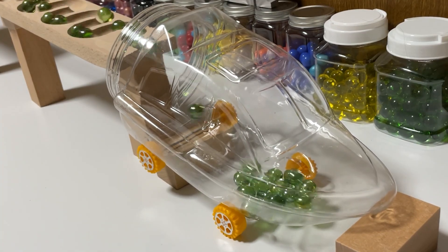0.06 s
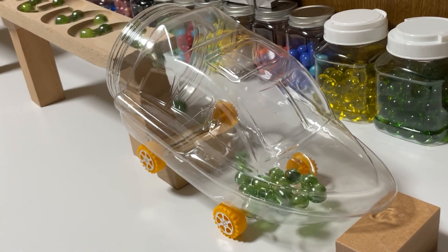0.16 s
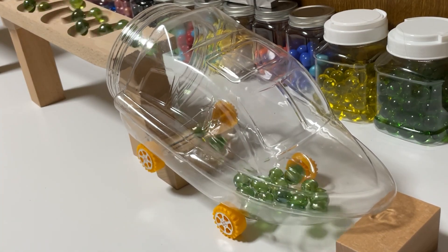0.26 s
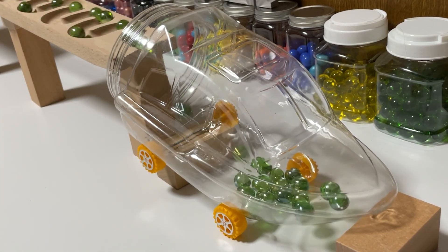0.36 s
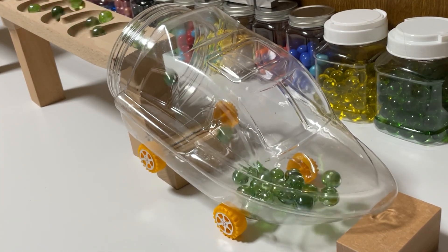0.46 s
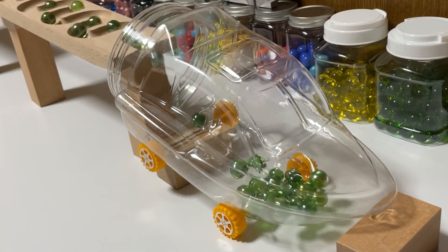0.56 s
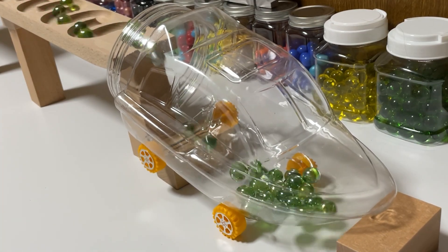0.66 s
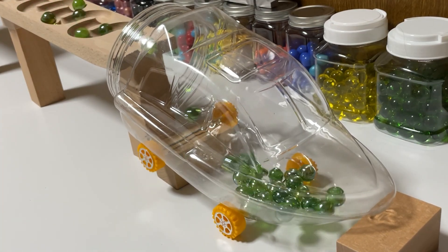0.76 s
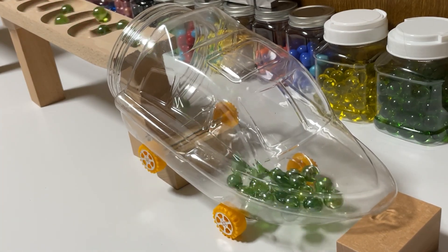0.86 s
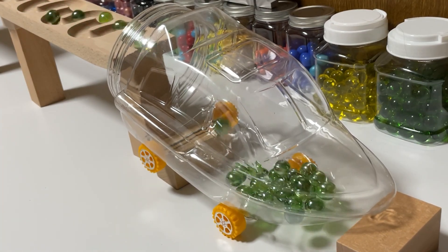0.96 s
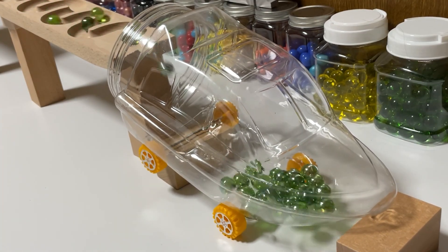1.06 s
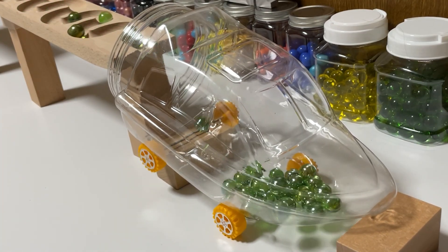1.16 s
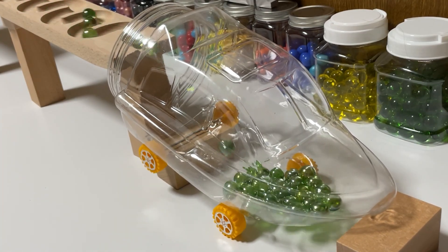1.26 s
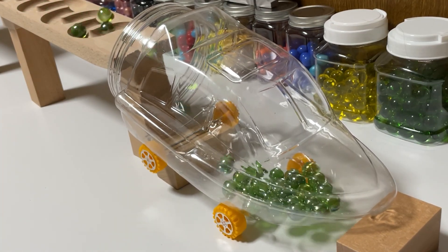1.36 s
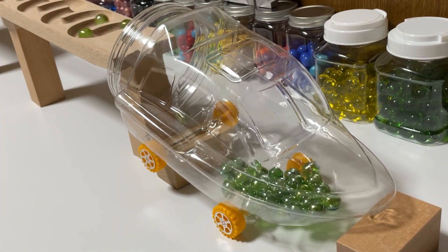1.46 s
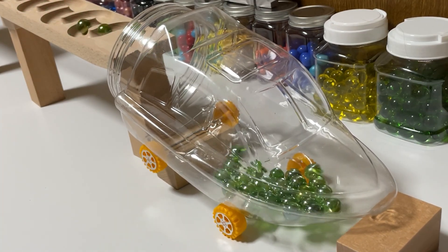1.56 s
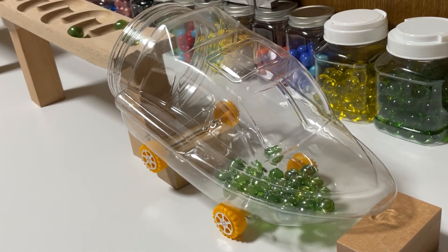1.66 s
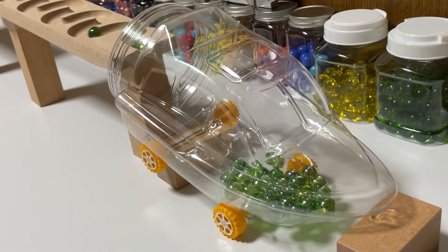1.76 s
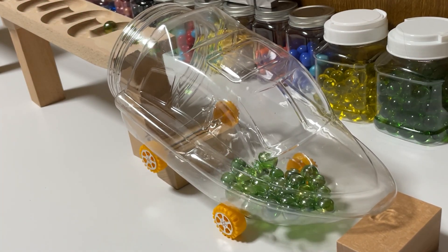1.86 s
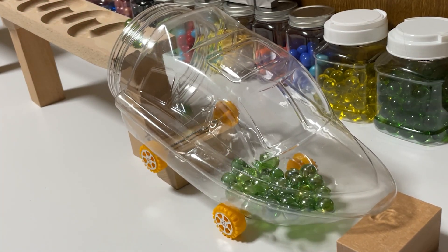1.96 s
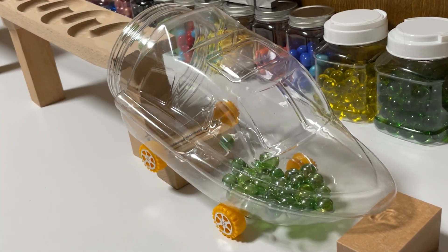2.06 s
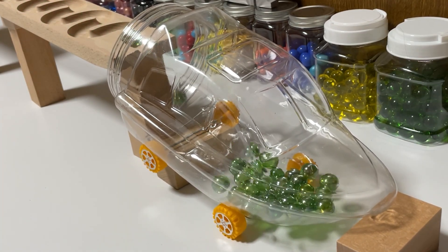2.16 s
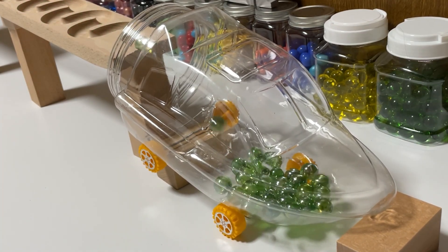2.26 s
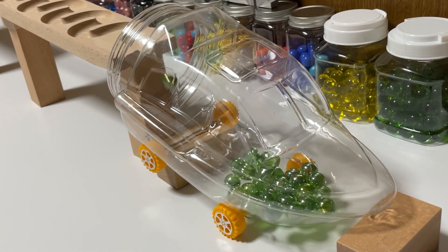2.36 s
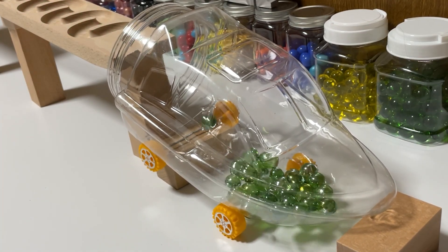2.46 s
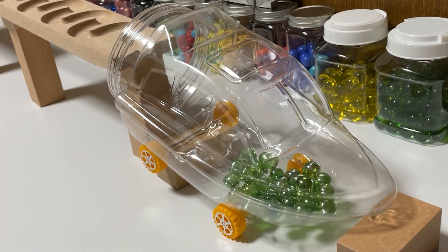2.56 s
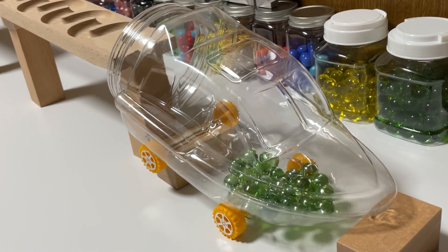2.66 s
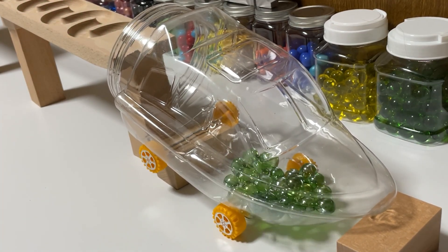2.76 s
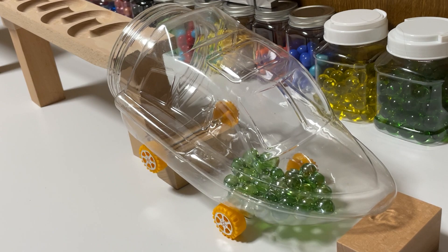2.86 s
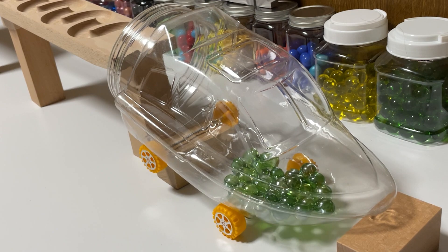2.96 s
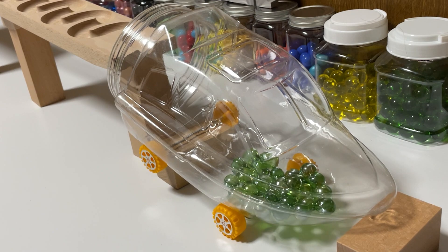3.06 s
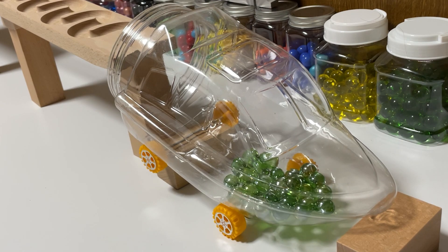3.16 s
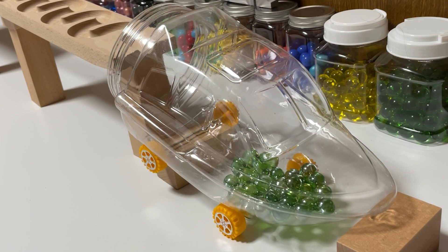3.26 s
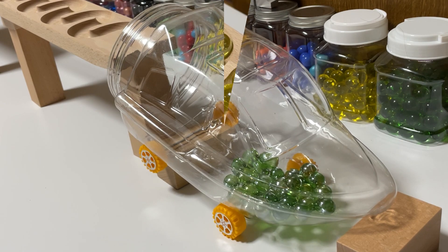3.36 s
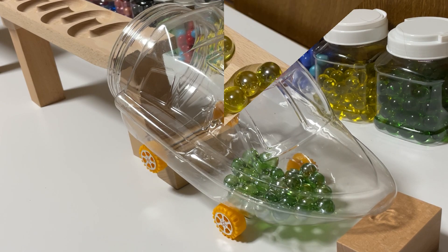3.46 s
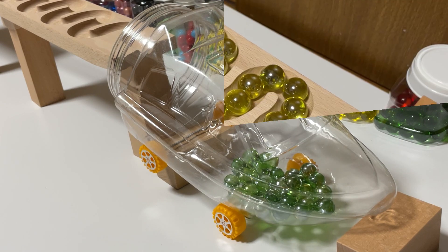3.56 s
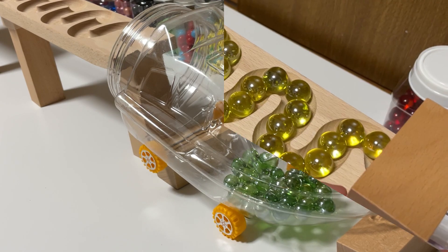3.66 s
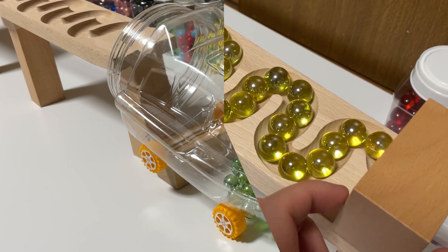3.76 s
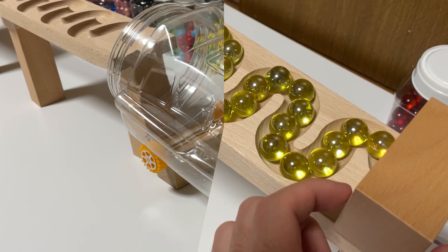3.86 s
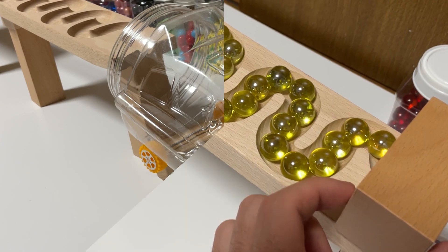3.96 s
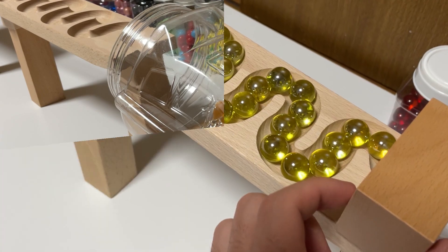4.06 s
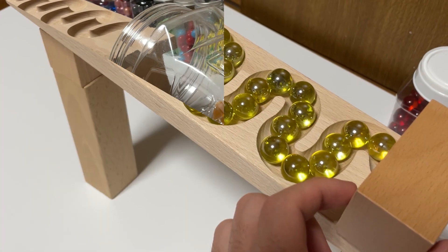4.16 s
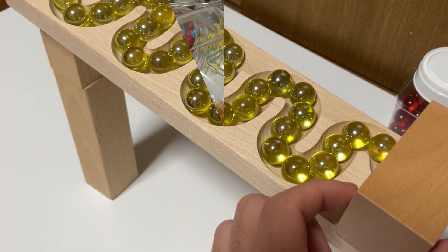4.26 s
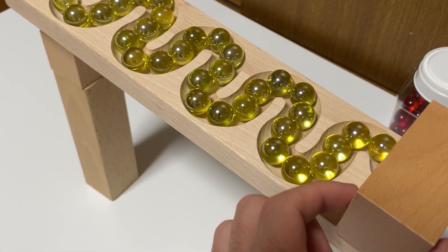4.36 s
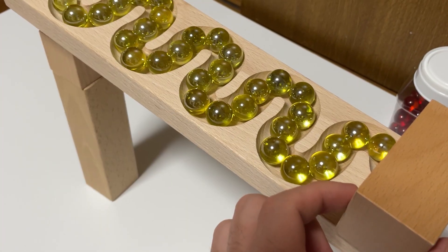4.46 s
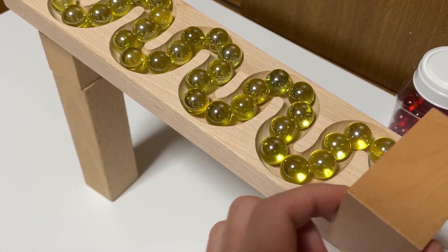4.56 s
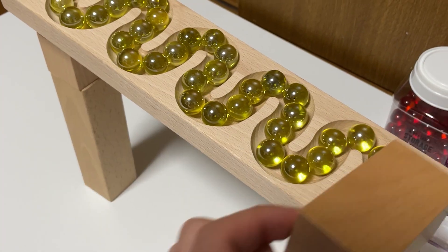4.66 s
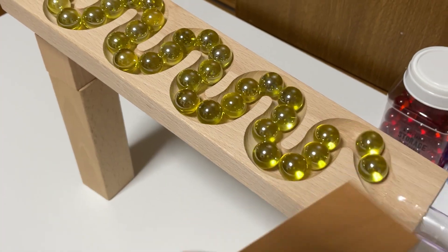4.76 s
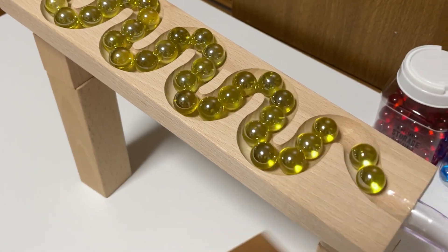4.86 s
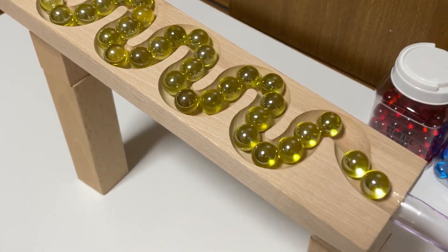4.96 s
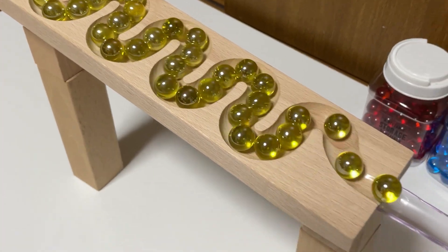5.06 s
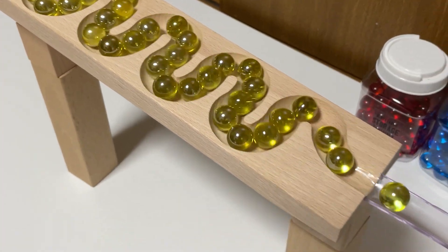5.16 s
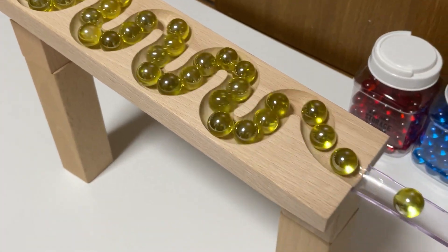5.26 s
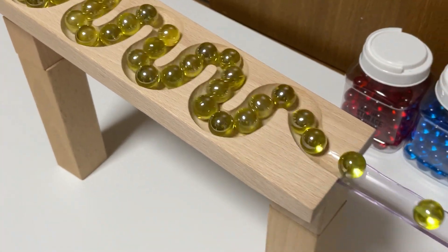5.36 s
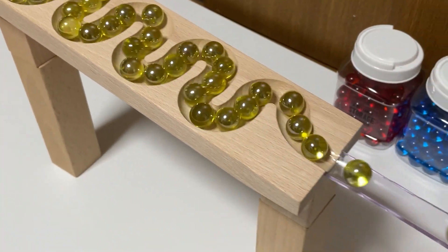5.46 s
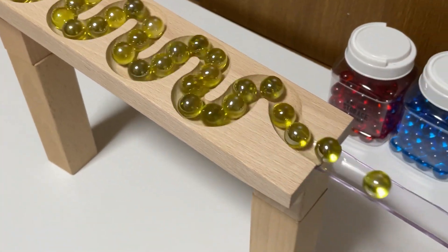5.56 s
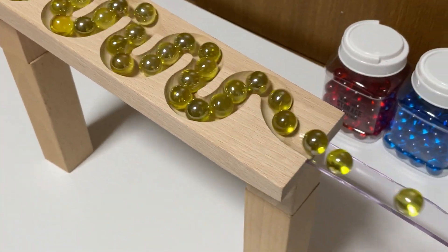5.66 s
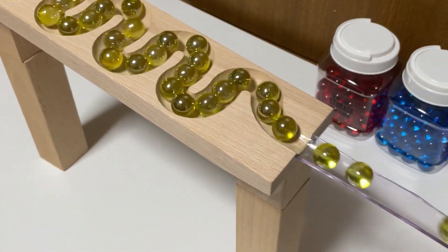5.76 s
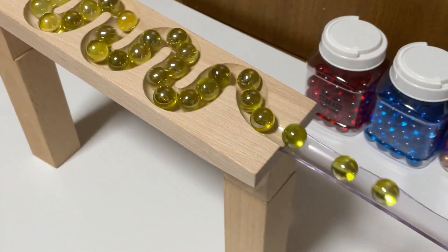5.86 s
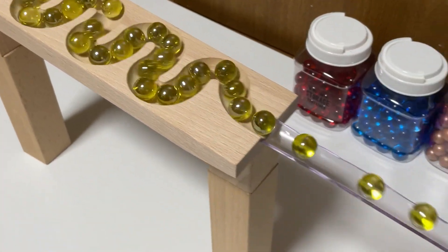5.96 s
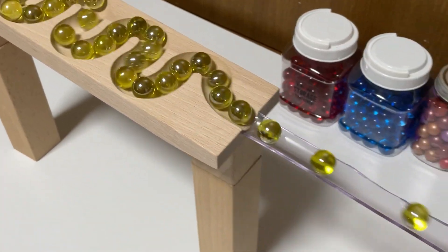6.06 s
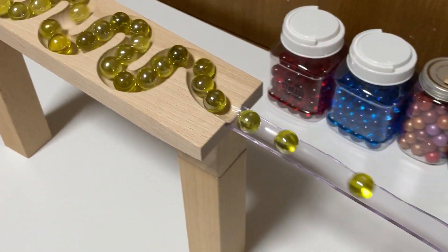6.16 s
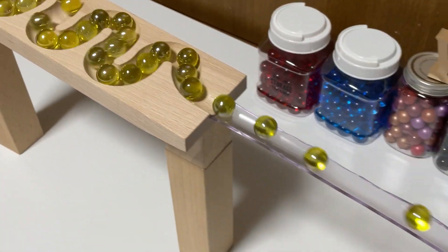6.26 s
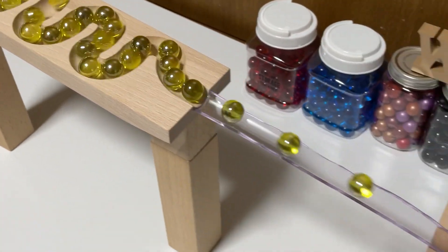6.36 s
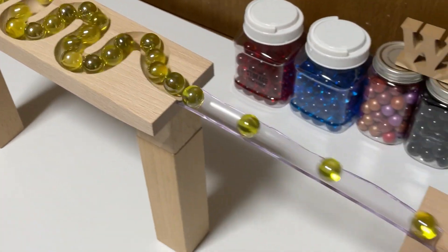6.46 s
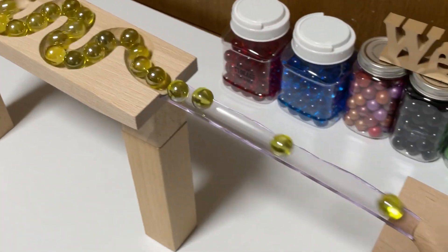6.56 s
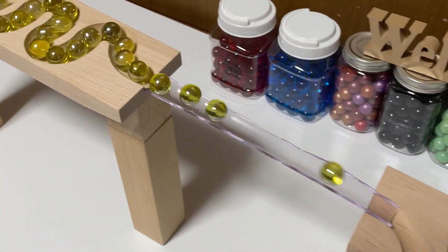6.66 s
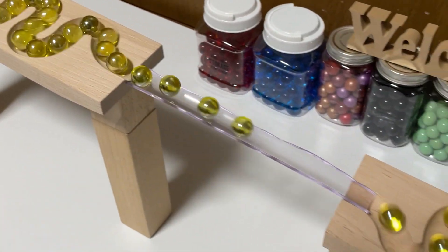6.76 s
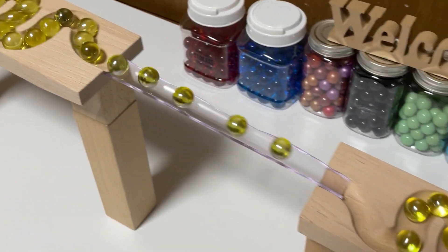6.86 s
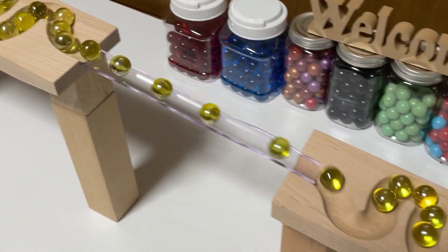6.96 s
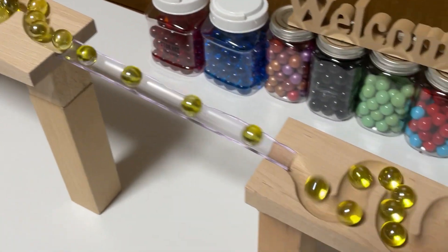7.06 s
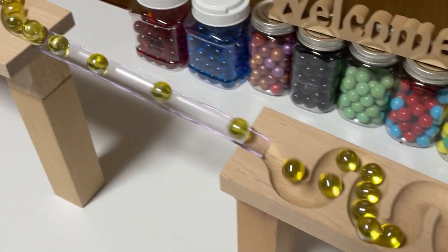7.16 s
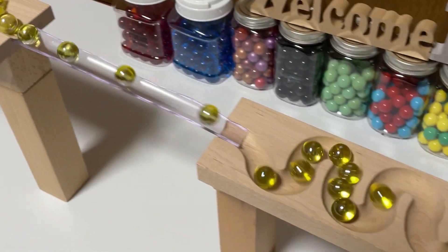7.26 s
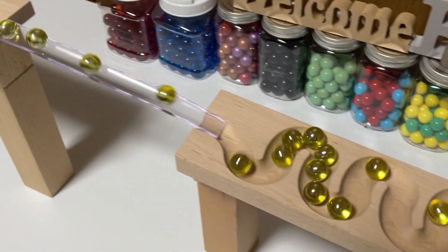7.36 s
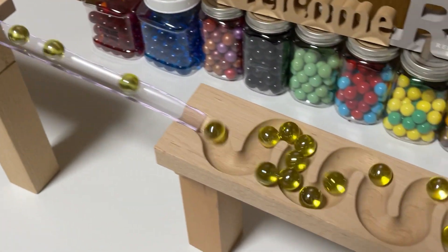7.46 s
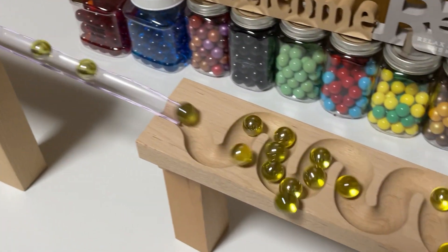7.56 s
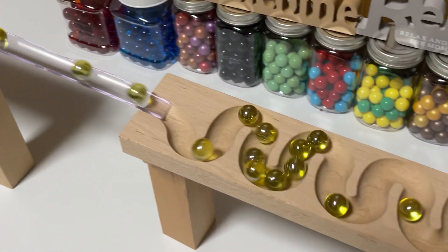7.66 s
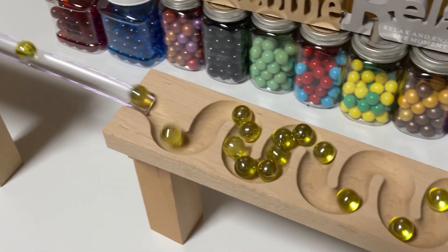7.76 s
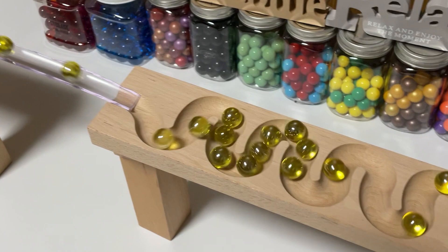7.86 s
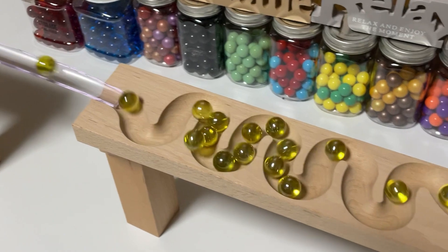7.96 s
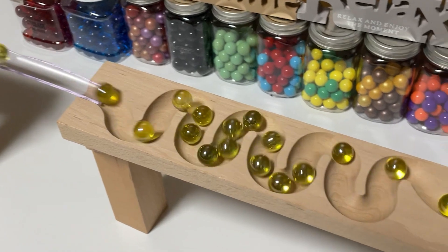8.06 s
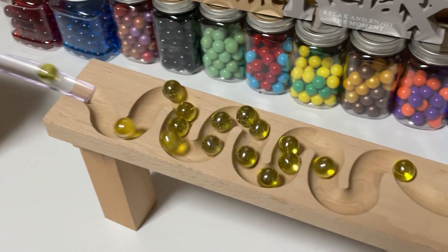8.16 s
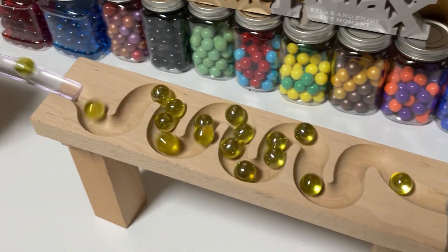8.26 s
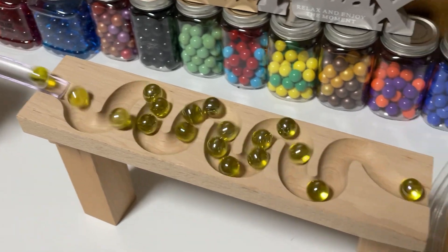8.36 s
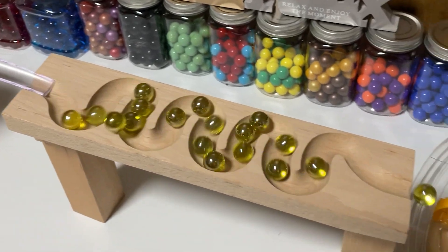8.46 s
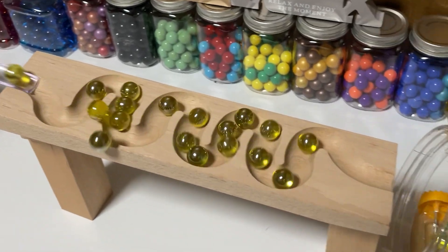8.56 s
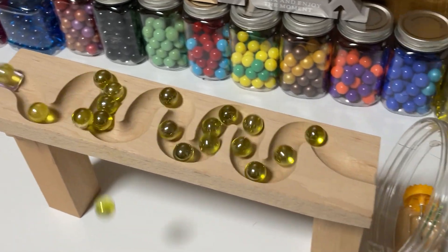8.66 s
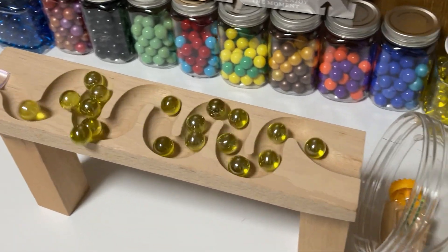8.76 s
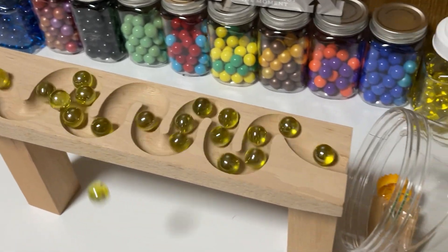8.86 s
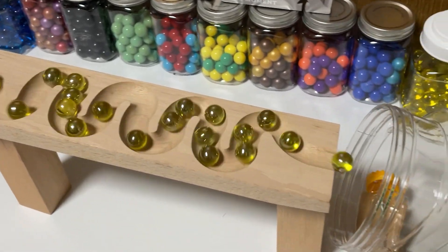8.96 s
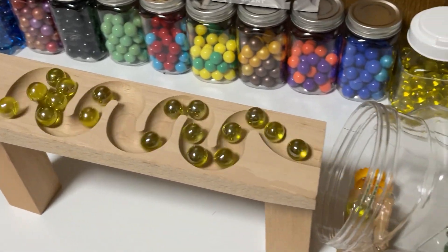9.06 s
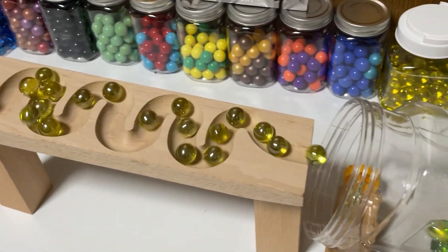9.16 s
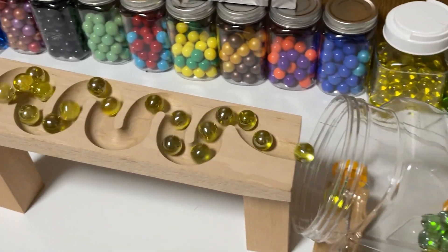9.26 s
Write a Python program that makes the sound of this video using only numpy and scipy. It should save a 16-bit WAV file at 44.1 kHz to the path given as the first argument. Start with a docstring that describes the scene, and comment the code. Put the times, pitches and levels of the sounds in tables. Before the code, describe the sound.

Small glass marbles rattle into a thin plastic toy car, fade to quiet, then bigger marbles roll and knock down wooden track and plastic chute.

```python
"""Marbles, a toy car and a marble run

Glass marbles drop into a thin plastic car and rattle on the heap inside; then it fades to a quiet room.
Bigger marbles roll down a grooved wooden board, click, knock along wooden bends and a ringing plastic
chute, and the first ones reach the car. Short bursts of noise act as the blows; resonances answer them.
A phone with two ports stands close, and a short noisy tail gives the room."""
import sys
import numpy as np
from scipy import signal
from scipy.fft import rfft, irfft
from scipy.io import wavfile

SR = 44100
rng = np.random.default_rng(int(sys.argv[2]) if len(sys.argv) > 2 else 0)


def wav_out(sig):
    """Save sig, one row per channel (or a flat mono array), as 16-bit PCM at SR to the path in sys.argv[1]."""
    wavfile.write(sys.argv[1], SR, np.round(np.clip(np.atleast_2d(sig).T, -1, 1) * 32767).astype(np.int16))


N = 411012
TIME = np.arange(N) / SR


def undb(db):
    """Turn decibels into a plain amplitude factor."""
    return 10 ** (np.asarray(db) / 20)


def curve(rows, col=1):
    """One table column drawn against time; silent outside its span."""
    rows = np.array(rows)
    return np.interp(TIME, rows[:, 0], rows[:, col], left=-200, right=-200)


def over_hz(rows, hz):
    """A table drawn against the logarithm of frequency."""
    rows = np.array(rows)
    return np.interp(np.log(hz), np.log(rows[:, 0]), rows[:, 1])


def both(first, second):
    """Two event tables as one, with a flag for events of the second kind."""
    s, db = np.transpose(first + second)
    return s, db, np.arange(len(s)) >= len(first)


def scatter(rate_per_s, db_curve, spread_db):
    """Random contact times; sizes spread upward from a level curve, strong ones rare."""
    draw = rng.random((int(rate_per_s * N / SR), 2))
    floor_db = db_curve[(draw[:, 0] * N).astype(int)]
    return draw[:, 0] * N / SR, floor_db - spread_db * np.log(1 - .93 * draw[:, 1])


def blows(times, db, rise_ms, t60_ms, solid_db=-99):
    """Each contact is one solid push (solid_db: its energy against the burst) and a short ragged burst.

    Of the two unrelated rows, the ports later share the first and hear the second with opposite sign."""
    hits = np.zeros(N)
    np.add.at(hits, np.clip((np.asarray(times) * SR).astype(int), 0, N - 1), undb(db))
    rise = np.exp(-1000 / (SR * rise_ms))
    fall = 10 ** (-3000 / (SR * t60_ms))
    grit = rng.standard_normal((2, N))
    push = hits * np.sign(grit) * undb(solid_db) / np.sqrt(1 - fall ** 2)
    envelope = signal.lfilter([1 - rise], np.convolve([1, -rise], [1, -fall]), hits)
    return envelope * grit + push


def resonate(x, hz, width_hz):
    """One resonance: sound near its pitch passes and rings on."""
    return signal.lfilter(*signal.iirpeak(hz, hz / width_hz, SR), x)


def ring(x, modes):
    """Sum of resonances with alternating sign."""
    return sum((-1) ** k * undb(db) * resonate(x, hz, width) for k, (hz, width, db) in enumerate(modes))


def struck(times, db, modes, rise_ms, t60_ms, spot_db, detune, solid_db, tilt_db=0):
    """Every blow lands on another spot, so each mode gets its own share and sounds a little flat or sharp."""
    spot = spot_db * rng.standard_normal((len(times), len(modes)))
    power = undb(2 * np.array(modes)[:, 2])
    spot = spot - 10 * np.log10(undb(2 * spot) @ power / power.sum())[:, None]  # the blow keeps its strength
    order = np.argsort(times)
    latest = order[(np.searchsorted(times[order], TIME) - 1).clip(0)]  # newest blow at each moment
    sharp = rng.random((len(times), len(modes))) > .5
    out = 0
    for k, (hz, width, mode_db) in enumerate(modes):
        octaves = np.log2(hz / modes[2][0])  # counted from the third mode
        sizes = db + mode_db + spot[:, k] + tilt_db * octaves
        push = blows(times, sizes, rise_ms, t60_ms * 0.97 ** octaves, solid_db - 2.2 * octaves)
        up = push * sharp[latest, k]
        out = out + resonate(up, hz * (1 + detune), width)
        out = out + resonate(push - up, hz * (1 - detune), width)
    return out


# room noise by pitch: (frequency [Hz], relative level per Hz [dB])
AIR = [(15, -33), (25, -16.5), (58, -2.5), (237, -23.5), (620, -37.5), (779, -38.5), (1500, -52.5),
       (7000, -56), (9500, -72)]
AIR_DB = -60.5  # overall level of the noise
# appliance hum: (frequency [Hz], level before the step [dB], level after it [dB])
HUM = [(55, -66.5, -67), (624.5, -97, -84)]
HUM_STEP_S = 3.88


def air():
    """Quiet low room noise, shaped by pitch, and a faint appliance hum of steady tones."""
    hz = np.fft.rfftfreq(N, 1 / SR) + 1
    noise = irfft(rfft(rng.standard_normal((2, N))) * undb(over_hz(AIR, hz)), N)
    hum = 0
    for f, before_db, after_db in HUM:
        level = undb(np.where(TIME > HUM_STEP_S, after_db, before_db))
        hum = hum + level * np.sqrt(2) * np.sin(2 * np.pi * f * TIME)
    return noise * undb(AIR_DB) / noise.std() + hum * [[1], [0]]  # hum only in the shared row


# marbles rolling in the groove: (time [s], rumble level [dB], small tick level [dB])
ROLL = [(4.66, -79, -63.5), (4.85, -67.5, -61), (5.2, -64, -46.5), (5.72, -53, -45), (5.8, -52, -35),
        (5.97, -49, -46.5), (6.35, -45.5, -32), (7.0, -52.5, -32.5), (9.32, -47, -28.5)]


def rolling():
    """Rolling is a crowd of tiny contacts: soft ones make the rumble, sharp ones the ticks."""
    rumble_s, rumble_db = scatter(200, curve(ROLL), spread_db=6.0)
    tick_s, tick_db = scatter(150, curve(ROLL, col=2), spread_db=3.0)
    return blows(rumble_s, rumble_db + 7.0, 1.6, 29), blows(tick_s, tick_db - 0.5, 0.044, 17.9)


# the gate block knocks the board: (time [s], level [dB])
TAPS = [(4.67, -45.5)]
# the gate block slides off the board: (start [s], length [s], level [dB])
SCRAPE = (4.5, 0.15, -43.5)


def gate_block():
    """The block gives a tap as a short blow and a scrape as noise that swells and fades."""
    tap_s, tap_db = np.transpose(TAPS)
    start_s, length_s, scrape_db = SCRAPE
    swell = np.sin(np.pi * np.clip((TIME - start_s) / length_s, 0, 1) ** 2.1) ** 2
    scrape = undb(scrape_db) * swell * rng.standard_normal((2, N))
    return blows(tap_s, tap_db - 9.5, 0.77, 35), scrape


# resonances of the groove: (frequency [Hz], width [Hz], level [dB])
GROOVE = [(530, 248, 2), (895, 460, 2.5), (1690, 290, -2.5)]


def groove(roll, clicks, scrape, taps):
    """The grooved wood answers everything that touches it; rolling passes its resonances twice."""
    return ring(ring(roll, GROOVE) + clicks + scrape + undb(20.0) * taps, GROOVE)


# resonances of the wooden board: (frequency [Hz], width [Hz], level [dB])
BOARD = [(680, 120, -4.5), (1290, 710, 2.5), (2400, 920, 1), (3500, 1300, -4)]


def board(s, db, ticks, loose, scrape):
    """Blows and rolling ticks ring the broad, quickly damped resonances of wood."""
    knocks = struck(s, db + 1.5, BOARD, 0.94, 19.8, spot_db=2.0, detune=0.092, solid_db=-6.5)
    return knocks + ring(undb(-21.0) * loose + undb(-10.5) * ticks + undb(-9.0) * scrape, BOARD)


# resonances of the plastic chute: (frequency [Hz], width [Hz], level [dB])
CHUTE = [(1630, 200, -5.5), (2960, 140, -1), (3300, 210, -12), (3890, 130, -3), (4637, 530, -7),
         (5310, 120, 0), (7114, 220, -6.5)]
CHUTE_S = 5.74  # the first marble leaves the board


def chute(s, db, loose):
    """Quick, hard blows and ticks ring the narrow, high resonances of the chute."""
    knocks = struck(s, db + 17.0, CHUTE, 0.14, 12.8, spot_db=3.5, detune=0.012, solid_db=-3.0)
    return knocks + ring(undb(10.0 - 0.97 * (TIME - CHUTE_S)) * loose, CHUTE)


# low resonances of the legs; the first two also serve the table: (frequency [Hz], width [Hz], level [dB])
LEGS = [(63, 21, -3), (85, 25.7, 3.5), (230, 103, -0.5)]


def legs(x, low_only=False):
    """Furniture under the marbles gives blows a low thump."""
    return ring(x, LEGS[:2] if low_only else LEGS)


# resonances of the glass: (frequency [Hz], width [Hz], level [dB])
GLASS = [(3670, 4700, -4.5), (6720, 1430, 13), (9210, 1720, 8.5), (14590, 1600, -6)]


def glass(x, top_only=False):
    """Marbles are small and stiff, so their own ringing is high."""
    return ring(x, GLASS[2:] if top_only else GLASS)


# marbles knocking the wooden bends: (time [s], level [dB])
KNOCKS = [(1.0236, -10.5), (1.2062, -21), (1.7105, -12), (5.7471, -19), (5.7803, -25.5), (5.9923, -19),
          (6.4762, -20.5), (6.641, -20.5), (6.787, -24), (6.6767, -8.5), (6.9296, -7), (6.996, -27),
          (7.1112, -9), (7.2316, -13.5), (7.2447, -14.5), (7.355, -13.5), (7.418, -7), (7.609, -20),
          (7.656, -16.5), (7.668, -8), (7.849, -13), (7.9801, -11), (8.0114, -6.5), (8.111, -18.5),
          (8.1963, -8.5), (8.2599, -12), (8.3103, -5.5), (8.6664, -9.5), (8.77, -2), (8.935, -14.5),
          (8.97, -11), (9.0214, -8), (9.051, -13), (9.2025, -9.5), (9.215, -16.5), (9.2335, -4)]
# marbles dropping on the chute: (time [s], level [dB])
CLINKS = [(5.801, -26), (6.0441, -24), (6.1703, -29), (6.2047, -25.5), (6.2216, -22), (6.2895, -23),
          (6.3041, -22.5), (6.3649, -21), (6.44, -20), (6.5787, -20), (6.648, -22.5), (6.6957, -19),
          (6.737, -28), (6.8144, -43), (6.8332, -22), (7.0467, -20.5), (7.058, -24), (7.119, -14),
          (7.16, -19.5), (7.286, -21.5), (7.2987, -15), (7.4, -16.5), (7.532, -18), (7.6304, -18.5),
          (7.7608, -8), (7.8097, -10.5), (7.875, -12), (8.045, -15), (8.1606, -9), (8.229, -18),
          (8.442, -6), (8.4985, -9.5), (8.5757, -9), (8.588, -13), (8.647, -19), (8.9574, -13),
          (8.983, -5.5)]
# marble against marble at the start of the board: (time [s], level [dB])
CLICKS = [(4.573, -49.5), (4.81, -39.5), (4.964, -46.5), (5.093, -44.5), (5.183, -28), (5.24, -39.5),
          (5.339, -32), (5.404, -33), (5.5494, -33), (5.609, -35.5), (5.731, -33), (5.93, -30)]
# short sharp touches of fast marbles, only the top of the glass sounds: (time [s], peak level [dB])
PINGS = [(6.2033, -26), (6.3353, -22), (6.357, -19.5), (7.1476, -22.5), (8.0507, -26), (8.4455, -15.5),
         (8.946, -27)]
KNOCK_RING_DB, CLINK_RING_DB = -23, 9.5  # chute ring over knock, for a blow on wood and on the chute
BEHIND_DB_PER_S = 7  # the chute falls behind the phone


def track():
    """Blows and rolling ring board, chute, legs and glass. Returns wood and chute, then legs and glass."""
    s, db, on_chute = both(KNOCKS, CLINKS)
    chute_db = np.where(on_chute, CLINK_RING_DB - BEHIND_DB_PER_S * (s - CHUTE_S), KNOCK_RING_DB)
    roll, ticks = rolling()
    taps, scrape = gate_block()
    loose = ticks * (TIME > CHUTE_S)  # the fine rolling ticks ring chute and bends only from here on
    click_s, click_db = np.transpose(CLICKS)
    wood_clicks = blows(click_s, click_db + 3.0, 0.55, 25)
    wood = board(s, db, ticks, loose, scrape) + chute(s, db + chute_db, loose)
    wood = wood + groove(roll, wood_clicks, scrape, taps)
    # a blow that misses the chute lands on wood and thumps the legs harder
    thumps = blows(s, db - 0.029 * chute_db - 0.5, 1.0, 57)
    low = legs(thumps + undb(10.5) * roll + undb(35.0) * taps)
    touches = blows(click_s, click_db + 0.5, 0.18, 11.6) + blows(s, db + chute_db - 7.5, 0.18, 12.0)
    high = glass(touches + undb(-11.5) * ticks)
    pings = glass(blows(*np.transpose(PINGS), rise_ms=0.091, t60_ms=18.0), top_only=True) * undb(0.5)
    return wood, low + high + pings


HEAP_DB, HEAP_RISE_S, HEAP_FALL_DB_PER_S = -13.5, 0.0032, 85


def stir(s, db):
    """Level [dB] of the heap: each landing adds unrest that swells, then dies away."""
    power = np.zeros(N)
    np.add.at(power, (s * SR).astype(int), undb(2 * db))
    swell, fall = np.exp(-1 / (SR * HEAP_RISE_S)), undb(-2 * HEAP_FALL_DB_PER_S / SR)
    unrest = signal.lfilter([1 - swell], np.convolve([1, -swell], [1, -fall]), power)
    return HEAP_DB + 10 * np.log10(unrest.clip(1e-20))


# marbles that land on the bare shell: (time [s], level [dB])
DROPS = [(0.098, -15.5), (0.259, -14.5), (0.35, -16), (0.424, -14), (0.471, -18.5), (0.595, -11),
         (0.693, -14), (0.803, -16), (0.829, -17), (0.8714, -19.5), (0.933, -19), (0.946, -14),
         (1.10, -21.5), (1.158, -13.5), (1.207, -18), (1.426, -17), (1.53, -20.5), (2.057, -24),
         (2.249, -18.5), (2.385, -23.5), (2.409, -15), (2.469, -15), (2.51, -23), (2.70, -28.5),
         (2.745, -23), (3.1438, -22), (8.322, -10.5), (8.445, -23.5), (8.50, -16.5), (8.552, -19.5),
         (8.592, -12.5), (8.697, -20), (9.105, -12.5), (9.302, -8.5)]
# marbles that land on other marbles: (time [s], level [dB])
CLACKS = [(.003, -15), (0.139, -17.5), (0.228, -15), (0.3242, -19), (0.3818, -32), (0.412, -23.5),
          (0.556, -13.5), (0.721, -17), (1.085, -19.5), (1.348, -20), (1.519, -15.5), (1.605, -18.5),
          (1.825, -30), (2.023, -18), (2.146, -22.5), (2.221, -28), (2.588, -17.5), (2.674, -21),
          (8.669, -11.5)]
# resonances of the plastic shell: (frequency [Hz], width [Hz], level [dB])
SHELL = [(165, 25, -7), (222, 40, 4.5), (372, 220, -1.5), (514, 50, 2.5), (721, 80, 6), (1074, 210, 1),
         (1675, 180, -5.5), (2307, 760, -10.5), (4500, 6900, -22.5)]
DROP_GLASS_DB, CLACK_GLASS_DB = -26.5, -10.5  # glass click over shell
BIG_S = 8.3  # from here on the big marbles reach the car
HEAVY_DB = -0.5  # per octave: big marbles push longer, so the shell answers darker
HARD_DB = 1.55  # per octave: glass on glass is a shorter contact, so the shell answers brighter


def car():
    """Drops and the settling heap shake the shell and the table; small glass meets glass on top."""
    s, db, on_glass = both(DROPS, CLACKS)
    heap = stir(s, db - 3.5 * (s > BIG_S))  # big marbles stir the heap less for their level
    nudge_s, nudge_db = scatter(380, heap, spread_db=4.0)
    times, sizes = np.r_[s, nudge_s], np.r_[db + 10.5, nudge_db - 1.5]
    # a full drop pushes longer than a nudge in the heap, so it is darker too
    tilt_db = HEAVY_DB * (times > BIG_S) - 2.0 * (np.arange(len(times)) < len(s))
    tilt_db = tilt_db + HARD_DB * np.r_[on_glass, np.zeros(len(nudge_s))]
    shell = struck(times, sizes, SHELL, 1.4, 38.0, spot_db=2.0, detune=0.033, solid_db=-6.5, tilt_db=tilt_db)
    # the shell's ring is cut below 140 Hz
    shell = signal.sosfilt(signal.butter(4, 140, "high", fs=SR, output="sos"), shell)
    click_db = np.where(on_glass, CLACK_GLASS_DB, DROP_GLASS_DB)
    rattle_s, rattle_db = scatter(520, heap, spread_db=3.5)
    clicks = blows(s, db + click_db + 9.5, 0.23, 9.8) + blows(rattle_s, rattle_db - 16.0, .2, 14.7)
    table = legs(blows(times, sizes - 12.5, 1.7, 37), low_only=True)
    return shell + glass(clicks, top_only=True) + table


def room(x, t60_s, room_db):
    """Walls send back a short noisy tail, duller than the blows."""
    t = np.arange(int(.5 * SR)) / SR
    dull_noise = signal.lfilter([1], [1, -.65], rng.standard_normal((2, len(t))))
    tail = dull_noise * 10 ** (-3 * t / t60_s) * (t > .004)
    tail = tail / np.sqrt((tail ** 2).sum(axis=1, keepdims=True))
    return x + undb(room_db) * signal.fftconvolve(x, tail, axes=1)[:, :N]


# how far the left port is ahead: (frequency [Hz], phase lead [rad])
PORT_LEAD = [(20, 0), (860, -.4), (7000, -.4), (7800, 3.0), (8900, 3.7), (11200, 6.4), (13000, 9.4),
             (15500, 12.6)]
# sound the ports do not share: (frequency [Hz], level [dB])
PORT_UNLIKE = [(60, -14), (150, -31.5), (300, -7), (1500, -2.5), (5000, -2), (8000, -6.5), (15000, -36.5)]


def ports(pair):
    """Two ports: sound bends round the phone, so treble arrives shifted and the mids partly unlike."""
    hz = np.fft.rfftfreq(N, 1 / SR) + 1
    shared, other = rfft(pair)
    other = other * undb(over_hz(PORT_UNLIKE, hz))
    turn = np.exp(1j / 2 * over_hz(PORT_LEAD, hz))
    return irfft([(shared + other) * turn, (shared - other) / turn], N)


def panned(x, db):
    """Make left louder than right by this many dB."""
    return x * undb(db * np.array([[.5], [-.5]]))


# the early car sound fades out: (time [s], level [dB])
FADE = [(2.858, 2.5), (3.0, -15), (3.4, -59.5)]
# side of the board and chute: (time [s], left minus right [dB])
PAN = [(4.5, 0), (6.1, -6.5), (7.2, -3), (9.32, -3)]
CAR_PAN_DB = -0.95  # left minus right, for all other sounds


def scene():
    """The early car sound fades out; marbles are heard in the car again from 8.3 s, after the track starts."""
    fade = np.where(TIME > SCRAPE[0], 1, undb(np.interp(TIME, *np.transpose(FADE))))
    wood, rest = track()
    near_car = fade * room(car(), t60_s=0.37, room_db=-10)
    near_car = near_car + room(rest, t60_s=0.42, room_db=-10) + air()
    wood = ports(room(wood, t60_s=0.42, room_db=-10))
    return panned(ports(near_car), CAR_PAN_DB) + panned(wood, np.interp(TIME, *np.transpose(PAN)))


def record(dry):
    """The phone drops the deepest bass, rounds the loudest peaks and cuts the top."""
    dry = signal.sosfilt(signal.butter(4, 45, "high", fs=SR, output="sos"), dry)
    rounded = np.tanh(1.837 * dry) / 3.13
    return signal.sosfilt(signal.ellip(10, .2, 80, 16300, fs=SR, output="sos"), rounded)


dry = scene()
out = record(dry)
wav_out(out)
```